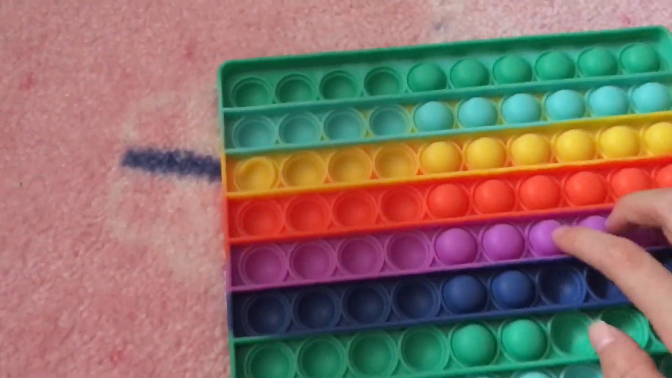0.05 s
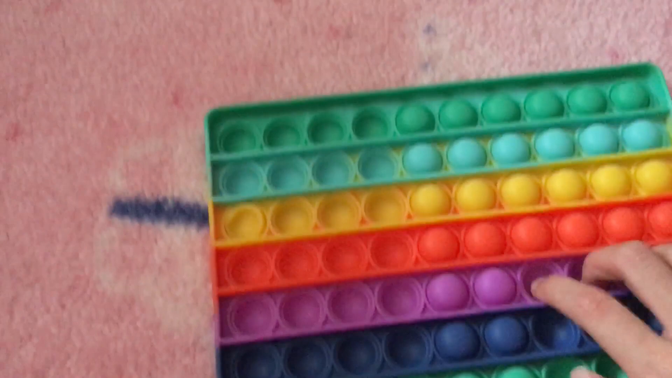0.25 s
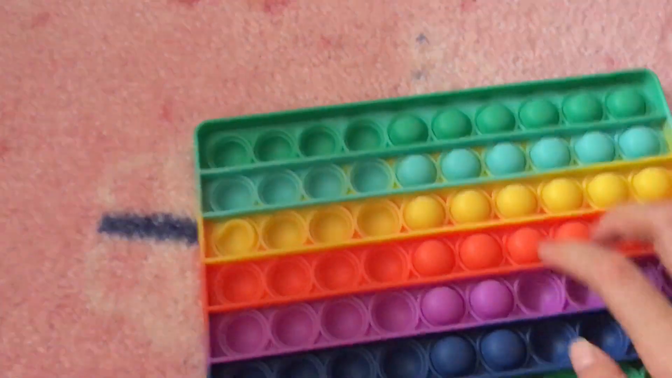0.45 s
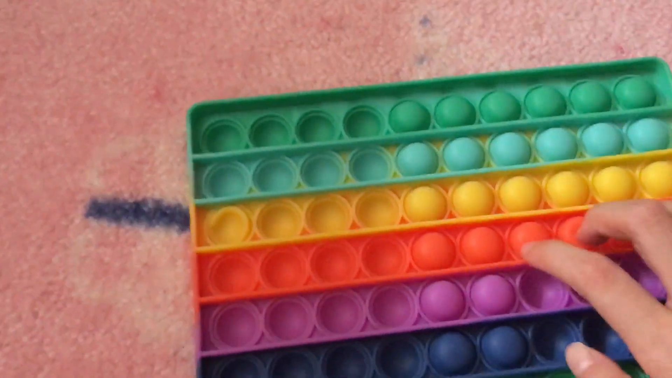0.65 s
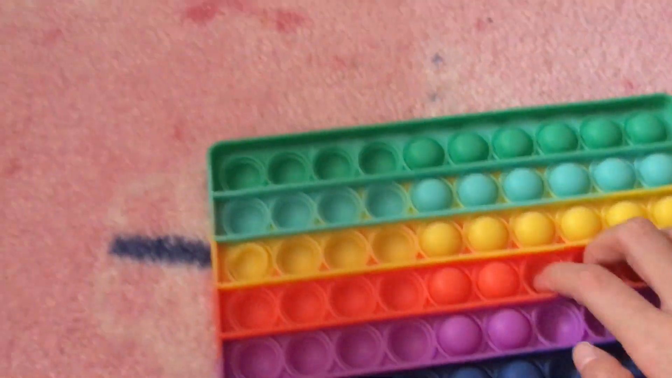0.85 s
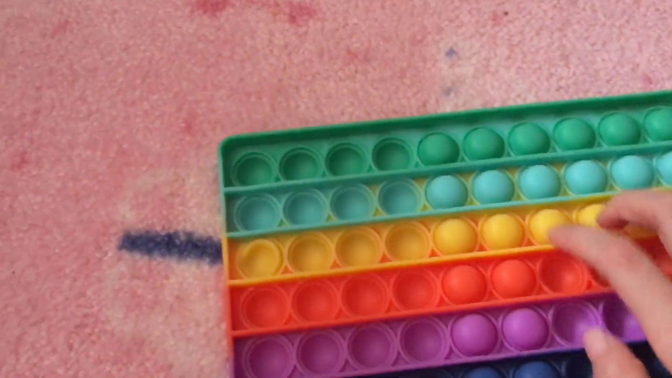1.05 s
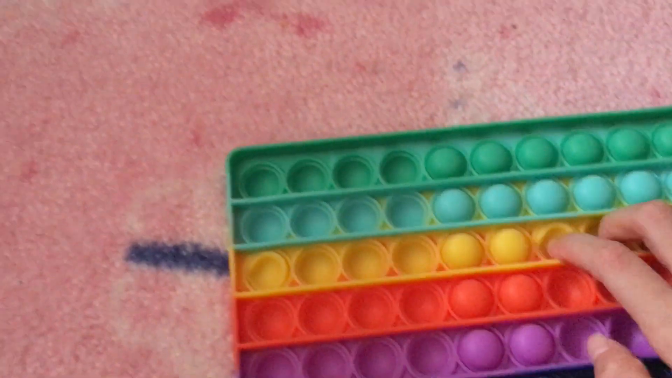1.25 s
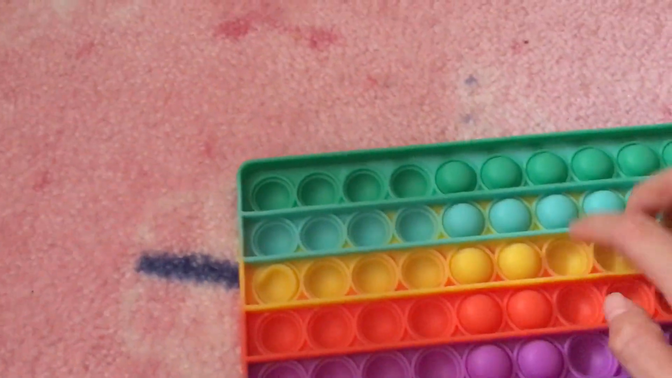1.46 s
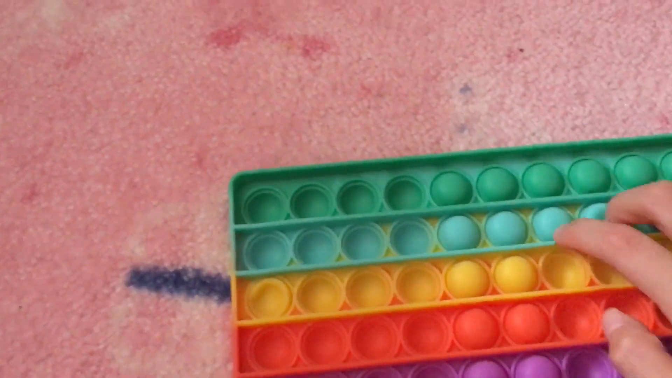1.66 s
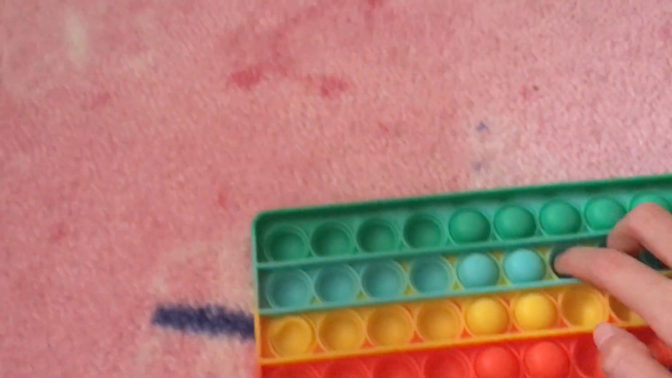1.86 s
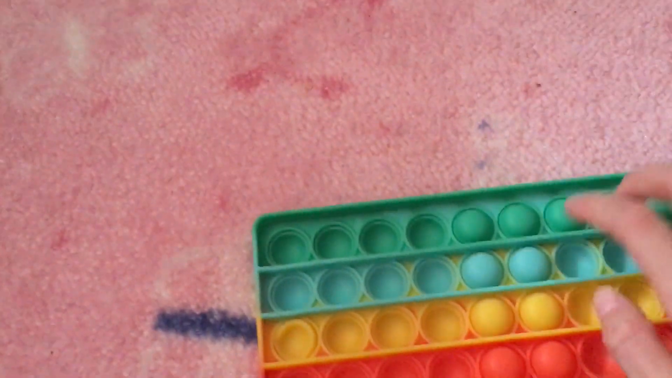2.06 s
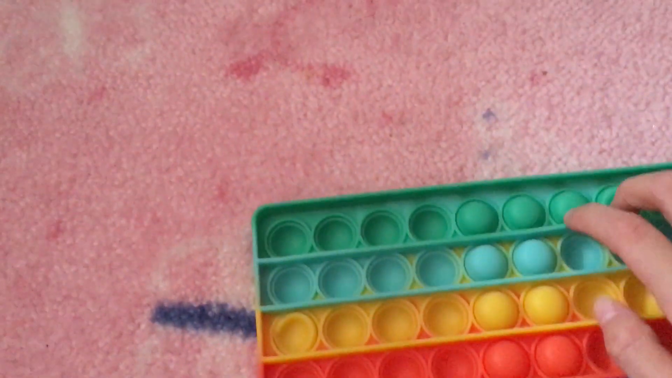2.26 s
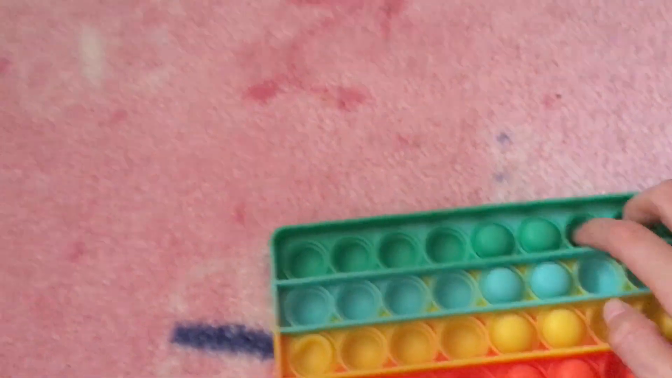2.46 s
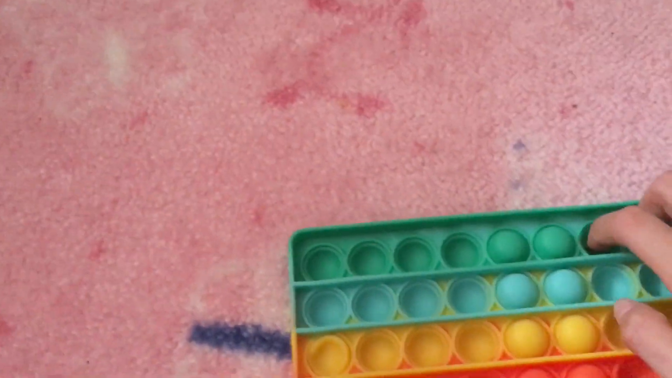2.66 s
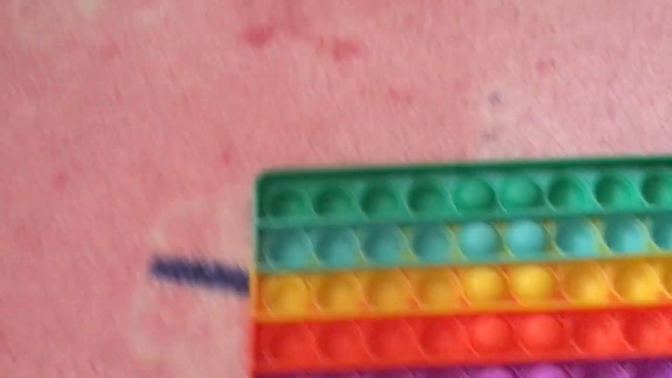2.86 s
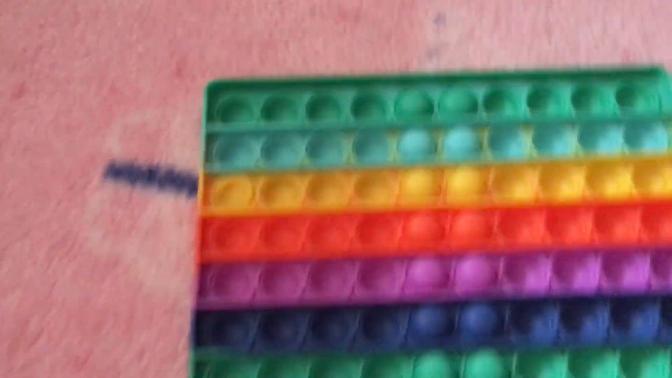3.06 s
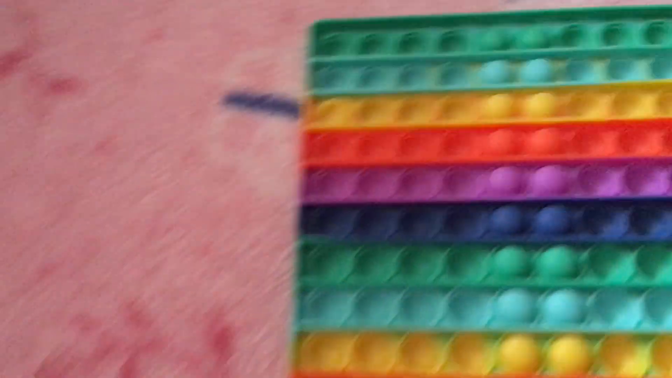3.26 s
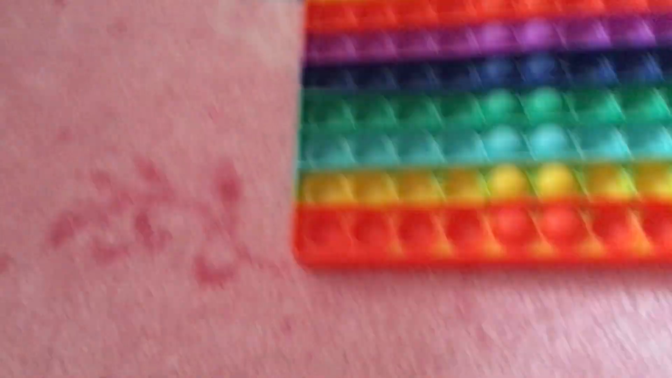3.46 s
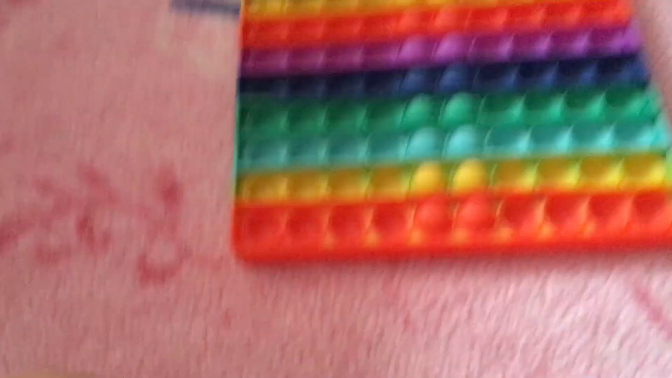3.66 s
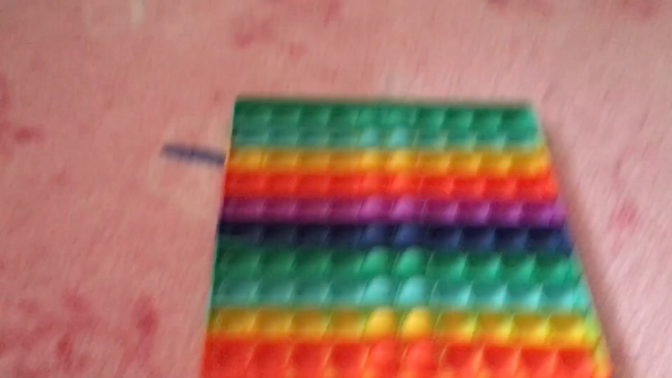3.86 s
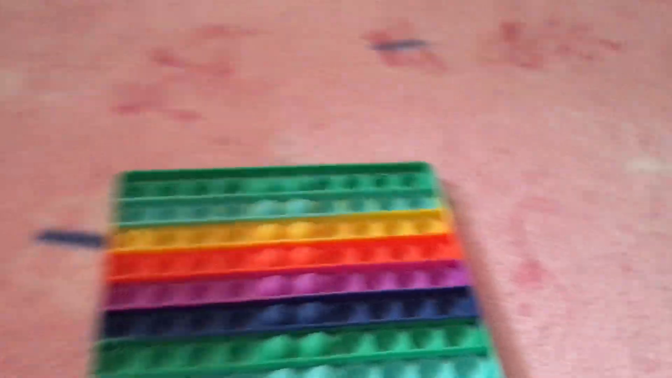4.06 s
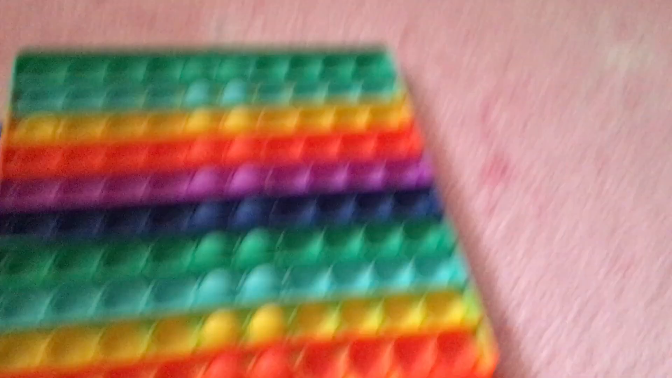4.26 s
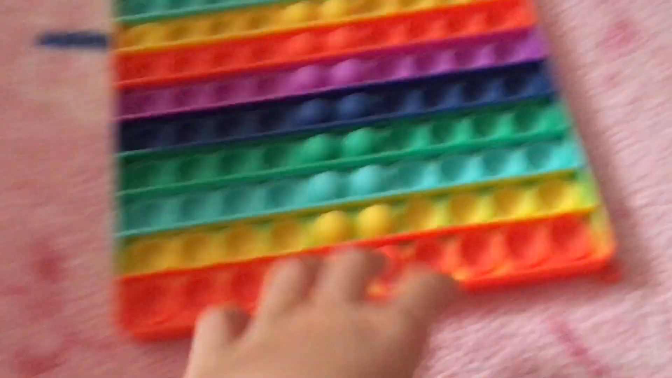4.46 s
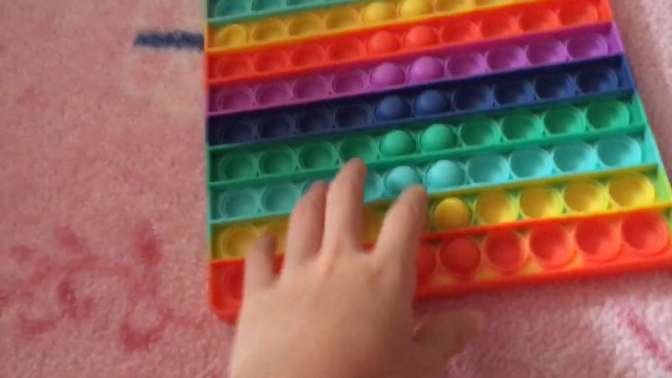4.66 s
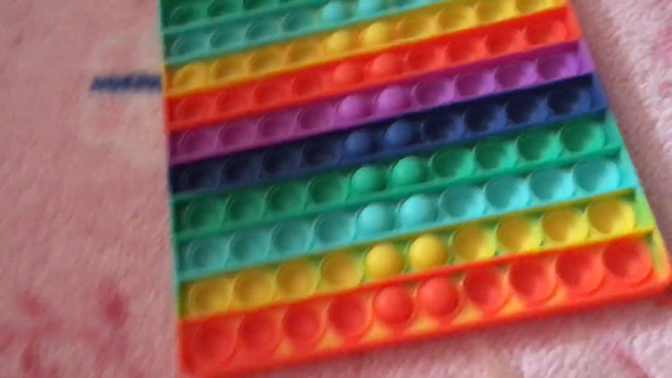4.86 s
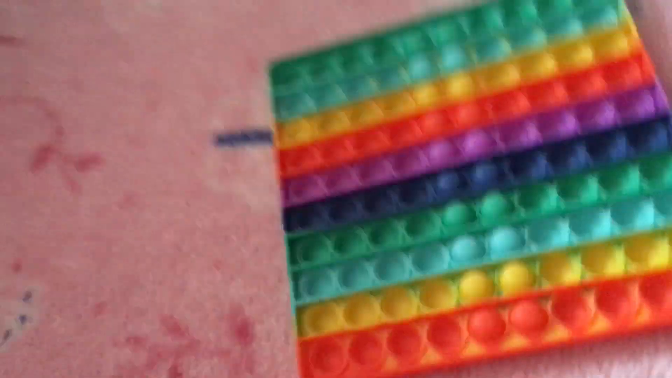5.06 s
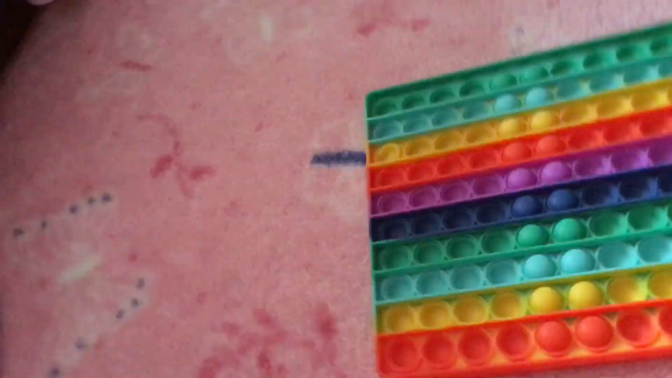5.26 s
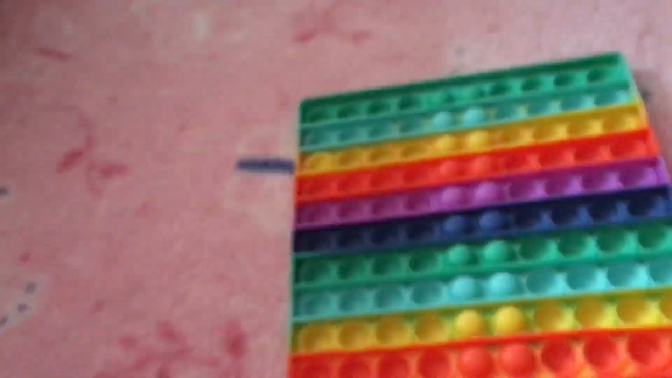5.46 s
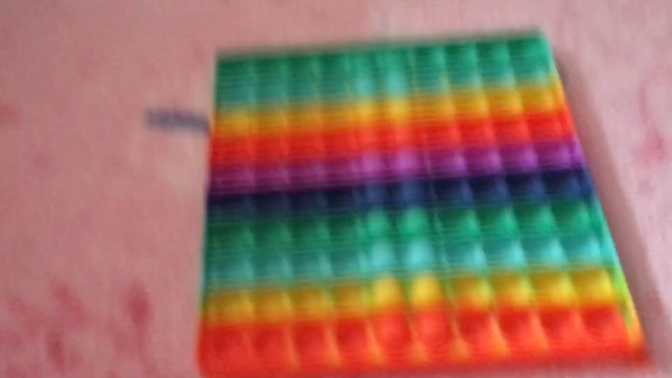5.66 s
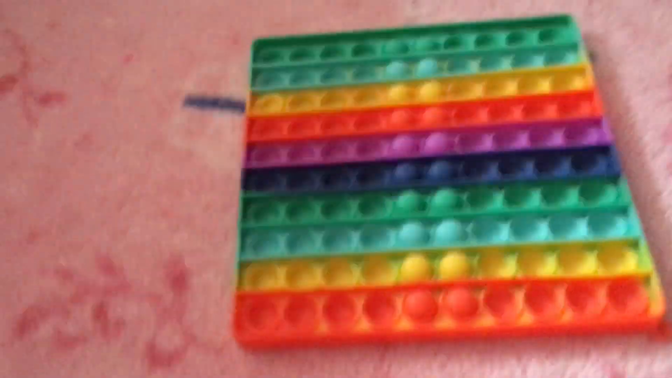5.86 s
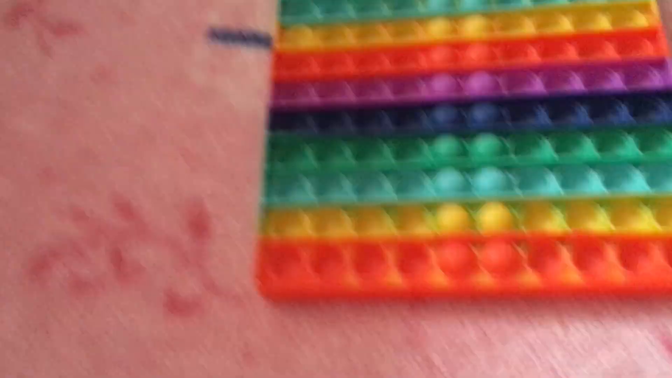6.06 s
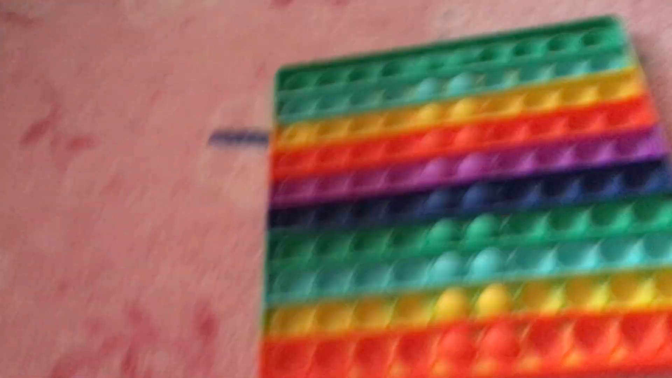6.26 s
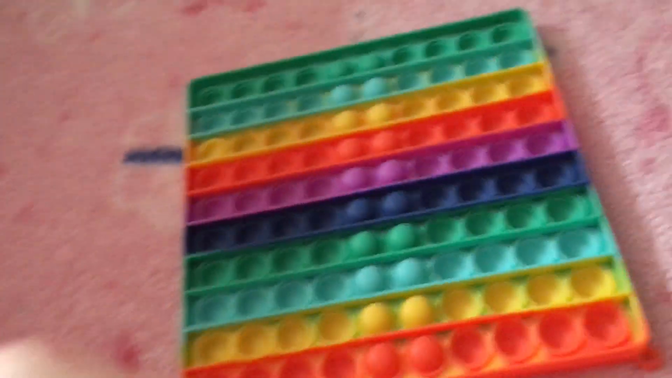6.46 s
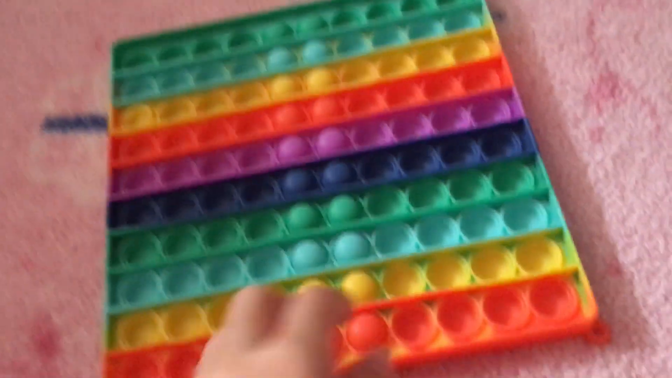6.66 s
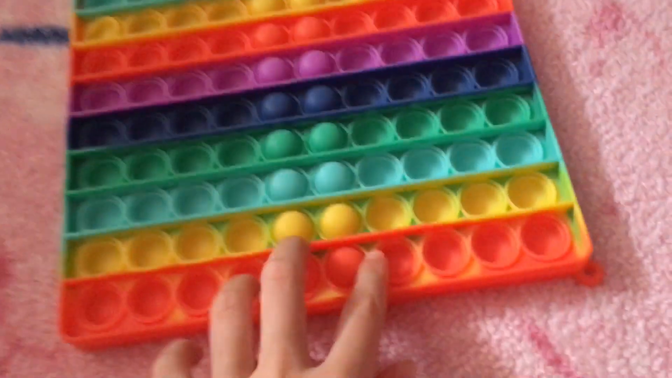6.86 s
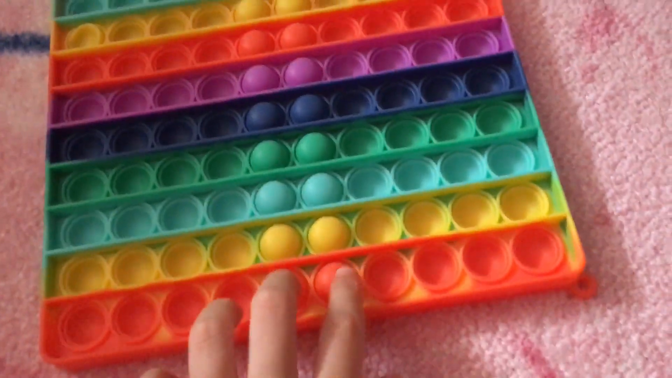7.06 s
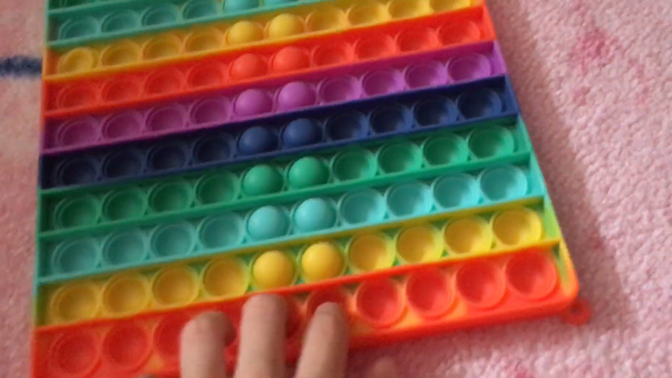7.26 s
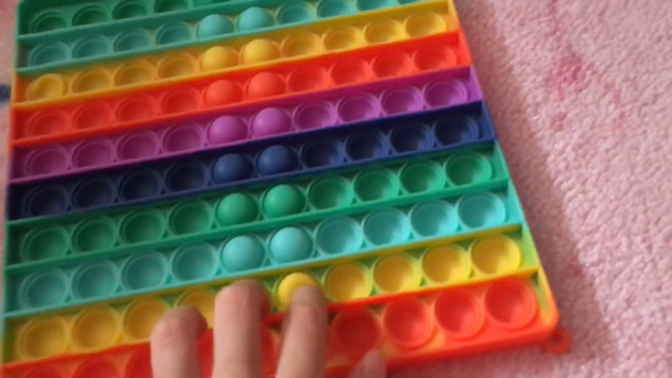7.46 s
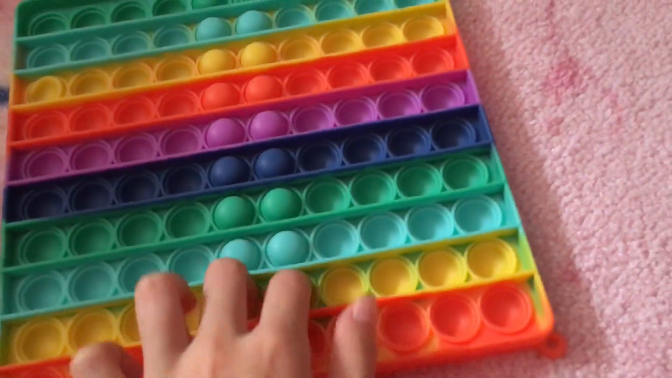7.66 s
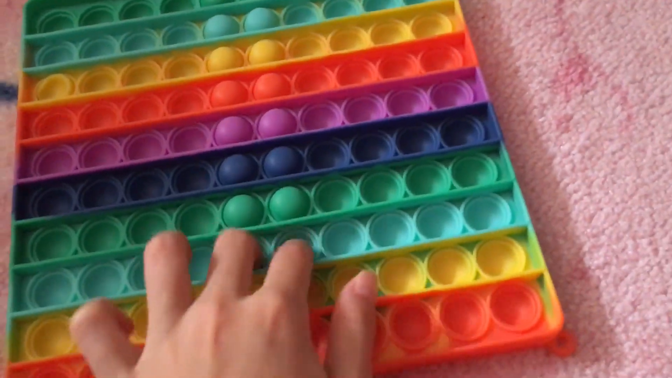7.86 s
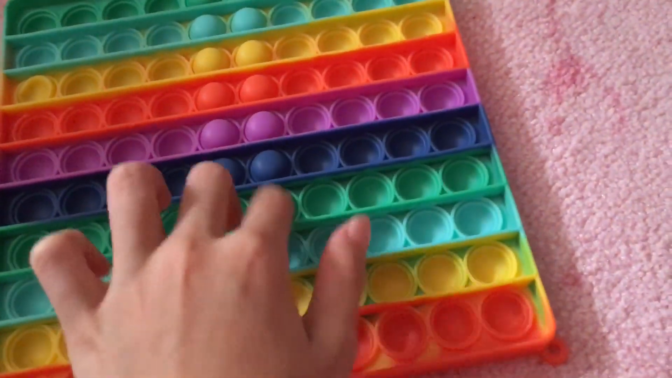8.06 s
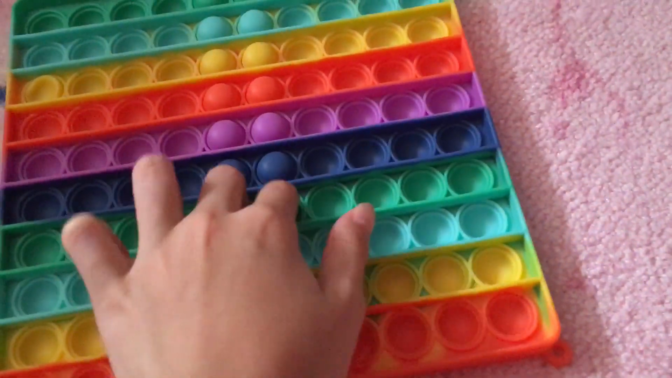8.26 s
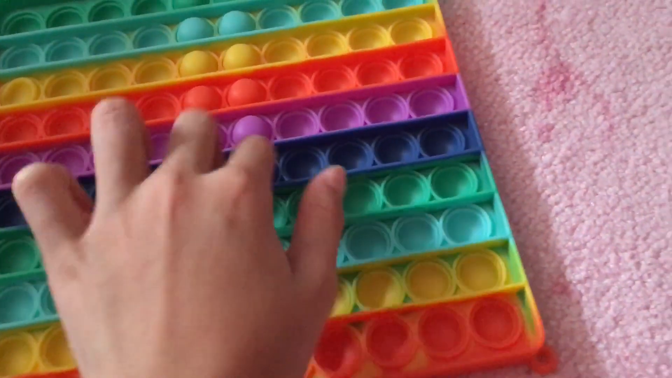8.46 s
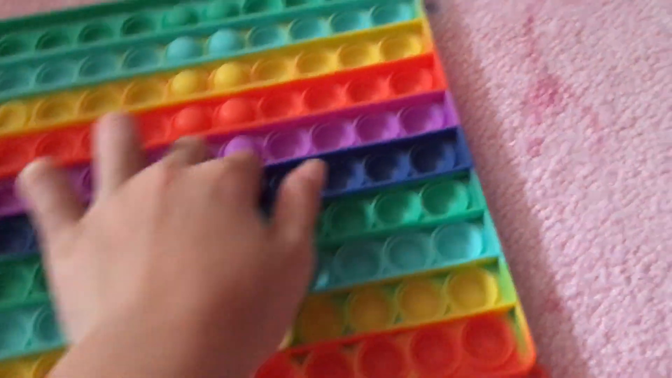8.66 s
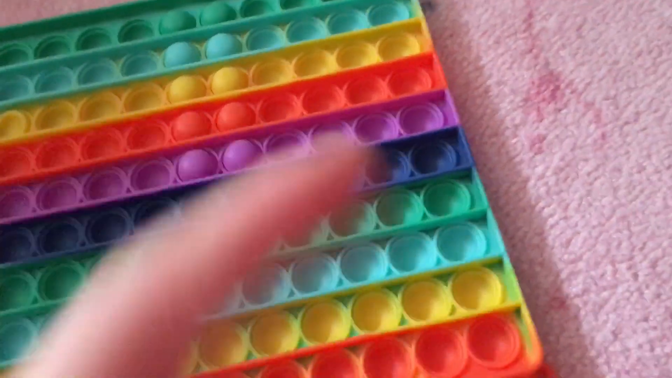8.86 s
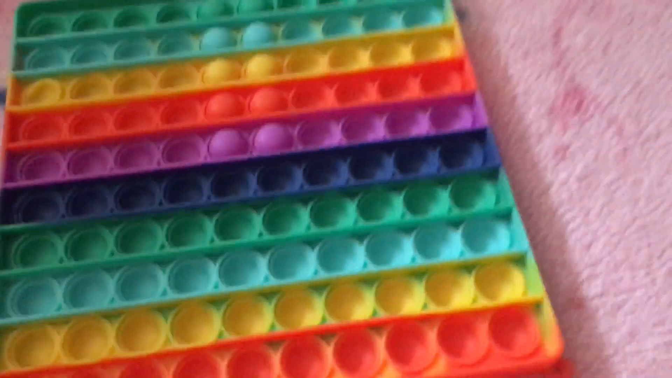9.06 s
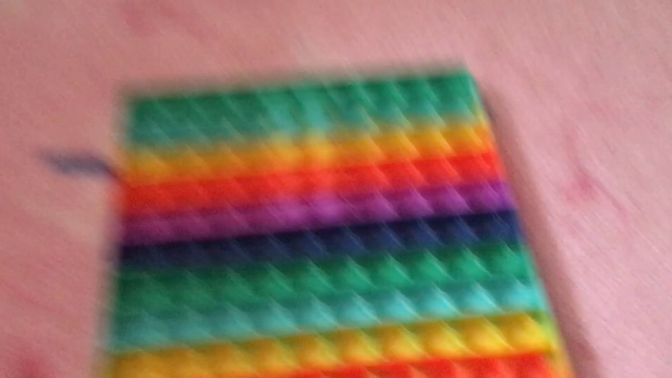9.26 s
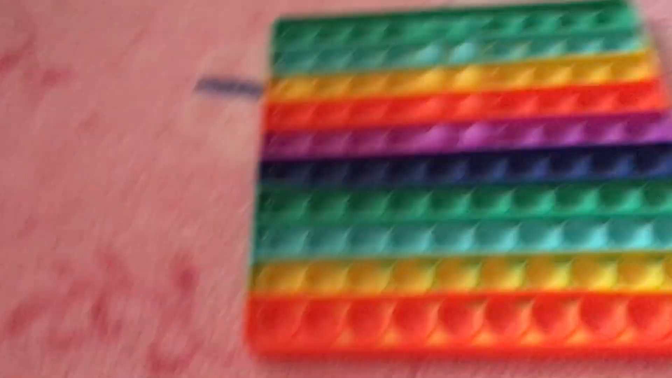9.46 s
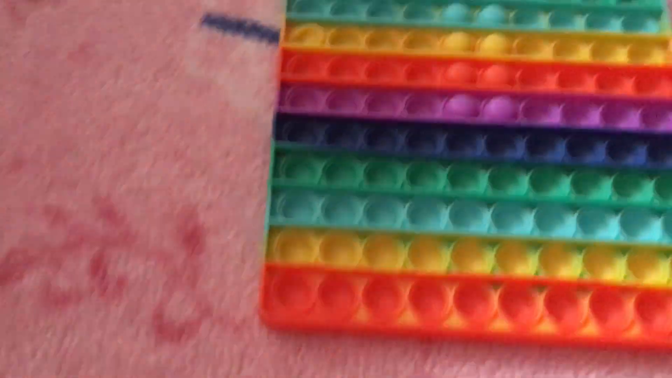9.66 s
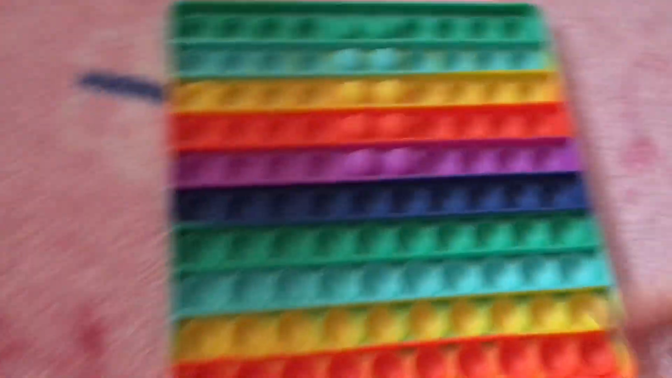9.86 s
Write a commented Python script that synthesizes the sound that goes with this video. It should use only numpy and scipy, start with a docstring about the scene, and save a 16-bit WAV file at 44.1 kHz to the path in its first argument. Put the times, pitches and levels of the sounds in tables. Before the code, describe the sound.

Silicone toy bubbles snap inward in short uneven groups, then the hand-held microphone rustles and thuds, before more pops and a final rub.

```python
"""Fingers press in the bubbles of a silicone pop toy lying on a fleece blanket in a small room.
Each dome buckles in a few quick snaps, every snap a twitch of falling pitch a few cycles long.
Fingertips also tap and slide on the silicone. Between the rows the hand-held microphone is shifted:
skin and cloth rub on its case as filtered noise, and fingers bump it with low thuds, once hard.
Beneath it all lie a faint rumble of the leaning hand and the steady noise of the still room."""
import sys
import numpy as np
from scipy import signal
from scipy.fft import rfft, irfft
from scipy.io import wavfile
from scipy.ndimage import uniform_filter1d

SR = 44100
rng = np.random.default_rng(int(sys.argv[2]) if len(sys.argv) > 2 else 0)


def dump(signal):
    """Clip the signal to [-1, 1] and save it as 16-bit WAV at the path in sys.argv[1]."""
    limited = np.clip(np.atleast_2d(signal).T, -1, 1)
    pcm = np.round(limited * 32767).astype(np.int16)
    wavfile.write(sys.argv[1], SR, pcm)


N = 437913
TIME = np.arange(N) / SR   # seconds
# clock of one short sound, in seconds: it stays at zero for the first 20 ms, then runs
AGE = np.maximum(TIME[:4096] - .02, 0)

# The snaps of the domes; a dome snaps one to five times as it flips.
# Each row: time in seconds, body level in dB (rms over the snap), rim in dB over the body,
# tick in dB over the body.
POPS = [(0.2046, -18.5, -3, -37), (0.215, -29, -10, -32), (0.221, -18, -2.5, -38.5),
        (0.2355, -18, -9.5, -44), (0.2514, -24, -4.5, -36), (0.7217, -28.5, -15, -32),
        (0.7254, -25, -13, -28), (0.7287, -27.5, -18, -26), (0.7335, -17, -5.5, -26), (0.76, -37, -9, -26),
        (0.7954, -25.5, -2, -29.5), (0.8175, -20, -15, -32), (1.1986, -28, -13.5, -31.5),
        (1.2081, -19.5, -11, -35), (1.2151, -23, -21, -24), (1.304, -19.5, -3.5, -32.5),
        (1.32, -24.5, -2.5, -36.5), (1.7209, -38, -10, -22.5), (1.7395, -27, -10.5, -39),
        (1.7549, -24.5, -5, -30.5), (1.8021, -29, -2, -31), (1.8277, -22.5, -8, -35),
        (2.3502, -42, -3, -14), (2.359, -34, -12, -18), (2.4696, -35.5, -8, -21.5), (2.5852, -35, -7, -17),
        (7.2216, -32.5, -7, -46), (7.231, -29.5, -13, -21), (7.2475, -33.5, -12.5, -15),
        (7.553, -40, -4, -49), (7.5702, -20.5, 0, -28), (7.5835, -20, 0.5, -18.5), (7.855, -28, -28, -37),
        (7.867, -20.5, -5, -39), (7.8801, -21.5, -6.5, -54.5), (8.255, -19, -5, -33),
        (8.2836, -18, -5, -28), (8.556, -34, -26, -31), (8.5681, -25, -13, -24.5),
        (8.5724, -19.5, -18, -41)]
# a full snap has this level and pitch; a gentler one swings lower
FULL_SNAP_DB, FULL_SNAP_HZ, SAG_OCTAVES_PER_DB = -24.5, 650, 0.1


def pops():
    """Domes flip in quick snaps, lower in pitch when gentle."""
    out = np.zeros(N)
    for time, body_db, rim_db, tick_db in POPS:
        gentleness_db = max(FULL_SNAP_DB - body_db, 0)
        hz = FULL_SNAP_HZ * 2 ** (-SAG_OCTAVES_PER_DB * gentleness_db)
        sound = snap(hz, body_db, body_db + rim_db, body_db + tick_db, lag_s=0.0027, ripple_db=5.5)
        add(out, time - .0003, sound)
    return out


# What a snapping dome rings with. Each row: frequency in Hz, relative level in dB.
DOME = [(60, -39), (110, -24), (200, -14.5), (350, -2.5), (470, -5.5), (620, 5), (800, 0), (1080, -7),
        (1550, -1.5), (2150, -9.5), (2600, -25.5), (3400, -30), (5000, -52), (9000, -69)]
DOME_HZ = 630   # the body pitch at which the table above is not shifted
SNAP_S = .004   # the span over which the level of a snap is counted


def snap(hz, body_db, rim_db, tick_db, lag_s, ripple_db, rim_spread=0.01):
    """A tick and the stiff rim sound first, the soft body swings just after."""
    # a snap that is mostly rim reaches higher
    rim_share_db = np.clip(rim_db - body_db + 6, -6, 8)
    rim_pitch = 2 ** (rim_share_db / 70) * np.exp(rim_spread * rng.standard_normal())
    body = bending_wave(DOME, hz / DOME_HZ, 1100, False, lag_s, ripple_db, SNAP_S)
    rim = bending_wave(DOME, rim_pitch, 1100, True, lag_s, ripple_db, SNAP_S)
    return from_db(body_db) * body + from_db(rim_db) * rim + from_db(tick_db) * tick()


# The colour of a tick. Each row: frequency in Hz, relative level in dB per Hz.
TICK = [(2500, 3), (4000, 1), (6000, 0.5), (9000, -7), (12000, -12.5), (15000, -19)]


def tick():
    """A very short bright click, made of fast-fading noise."""
    return rms_one(burst(TICK, rise_s=.0002, t60=.008), SNAP_S)


FREQ = np.maximum(np.fft.rfftfreq(len(AGE), 1 / SR), 1)   # Hz
DAMPING_S = .03   # the hand and the blanket smother a flexing pulse after this time


def bending_wave(spectrum, pitch, split_hz, upper, lag_s, ripple_db, span_s):
    """A flexing pulse below or above a split: bending waves travel as the root of frequency, lows late."""
    hz, db = np.transpose(spectrum)
    # random peaks and dips along the spectrum
    bumpiness = np.interp(np.sqrt(FREQ / 20), np.arange(len(FREQ)), rng.standard_normal(len(FREQ)))
    side = (FREQ / split_hz) ** (8 * upper) / (1 + (FREQ / split_hz) ** 8)
    gain = from_db(np.interp(np.log(FREQ / pitch), np.log(hz), db) + ripple_db * bumpiness)
    gain = gain * side * np.minimum(FREQ / hz[0], 1)
    # lag_s is the travel time at 1 kHz; the 3 kHz front arrives at age zero
    quiet_s = np.mean(AGE == 0) * len(AGE) / SR
    turns = 2 * lag_s * np.sqrt(1000 * FREQ) + FREQ * (quiet_s - lag_s / np.sqrt(3))
    wave = irfft(1j * gain * np.exp(-2j * np.pi * turns), len(AGE))
    # a soft front, with silence ahead of it
    arrived = uniform_filter1d((AGE > 0) * 1.0, size=131)
    smothered = np.exp(-(AGE / DAMPING_S) ** 2)
    return rms_one(wave * np.minimum(2 * arrived, 1) * smothered, span_s)


# A fingertip lands on the silicone. Each row: start in seconds, rim level in dB.
TOUCHES = [(0.519, -48.5), (0.5256, -47), (1.0551, -48), (1.065, -49.5), (1.091, -57), (1.4772, -51),
           (1.583, -46.5), (2.1084, -49.5), (7.4419, -56.5), (7.8188, -55.5), (8.1, -59), (8.201, -56.5),
           (8.525, -54), (8.5342, -56)]
TOUCH_HZ, TOUCH_BODY_DB, TOUCH_TICK_DB = 839, 1, -21.5   # the levels are relative to the rim


def fingertip_touches():
    """Fingertips land with a light tap that flexes the silicone like a small snap."""
    out = np.zeros(N)
    for time, db in TOUCHES:
        tap = snap(TOUCH_HZ, db + TOUCH_BODY_DB, db, db + TOUCH_TICK_DB, lag_s=0.0011, ripple_db=8.0)
        add(out, time, tap)
    return out


# A fingertip slides over the silicone.
# Each row: time of the middle in seconds, half length in seconds, peak level in dB.
SLIDES = [(0.932, 0.0038, -62.5), (1.445, 0.0087, -63), (2.786, 0.0057, -61), (2.83, 0.014, -63),
          (7.028, 0.0051, -63.5), (8.639, 0.058, -76.5)]
# The colour of the squeak. Each row: frequency in Hz, relative level in dB per Hz.
SQUEAK = [(1500, 9), (3500, -5.5), (5200, 3), (6500, -5), (7500, -17), (12000, -16)]


def finger_slides():
    """Brief soft squeaks of skin on silicone, each a swell of coloured noise."""
    return sum(swell(*row) for row in SLIDES) * noise(SQUEAK)


# Where the toy's sound lingers in the room.
# Each row: low edge in Hz, high edge in Hz, time to fade by 60 dB in seconds, level in dB.
ROOM = [(150, 560, 0.12, -29.5), (504, 1500, 0.21, -32), (1050, 2200, 0.14, -28), (2292, 3510, 0.17, -22),
        (3730, 21000, 0.11, -11)]


def room(x, build_s=0.0017):
    """Diffuse reflections build up quickly and die band by band."""
    age = TIME[:SR // 2]
    tail = 0
    for low, high, t60, db in ROOM:
        band = cut(rng.standard_normal(len(age)), [low, high], "band", order=3)
        band = band * from_db(-60 * age / t60) * (1 - np.exp(-(age / build_s) ** 2))
        tail = tail + from_db(db) * band / np.sqrt(np.sum(band ** 2))
    return signal.fftconvolve(x, tail)[:N]


# A finger bumps the case. Each row: start in seconds, thud pitch in Hz, thud level in dB,
# knock level in dB; both levels are rms over the bump.
BUMPS = [(2.973, 135, -54, -53.5), (3.117, 182, -43, -49), (3.287, 169, -46, -51), (3.454, 150, -56, -55.5),
         (3.537, 164, -48, -50), (3.607, 250, -48.5, -57), (3.697, 165, -59, -68), (3.784, 160, -50, -44.5),
         (3.834, 222, -48, -51), (3.919, 123, -35, -55), (4.103, 132, -44, -56), (4.297, 122, -40.5, -40),
         (4.943, 142, -49, -60.5), (5.016, 122, -38, -49), (5.422, 182, -12.5, -45.5),
         (5.499, 215, -41, -54), (5.595, 171, -42, -56), (5.679, 172, -55, -55.5), (5.792, 218, -44, -39.5),
         (5.888, 219, -57, -50.5), (5.904, 200, -61, -46), (5.986, 169, -45, -53), (6.067, 195, -55, -54),
         (6.166, 192.6, -50.5, -69), (6.285, 200, -55, -58.5), (6.338, 159, -51, -59.5),
         (6.375, 172, -45.5, -50), (8.955, 157.4, -23, -43.5), (9.021, 139, -46.5, -47),
         (9.047, 121, -46, -54.5), (9.122, 200, -39.5, -45.5), (9.282, 246, -49.5, -52),
         (9.433, 110, -49.5, -45), (9.609, 231, -69, -54)]
# What the bumped case rings with. Each row: frequency in Hz, relative level in dB.
CASE = [(30, -42.5), (60, -19.5), (110, -10.5), (165, 4), (235, -12), (290, -5), (420, -23), (700, -25.5),
        (1100, -27), (2000, -39), (3000, -41), (6000, -67.5)]
CASE_HZ = 175   # the thud pitch at which the table above is not shifted
BUMP_S = .02   # the span over which the level of a bump is counted
# the scratch grows with the thud: dB (before it is halved) at a typical thud, and dB per dB
SCRATCH_DB, TYPICAL_THUD_DB, SCRATCH_FOLLOWS = -62, -44.5, 0.62


def bumps(lag_s=0.003238):
    """A finger meets the case: a scratch and a short skid, then the heavy low swing."""
    out = np.zeros(N)
    for time, hz, thud_db, knock_db in BUMPS:
        thud = bending_wave(CASE, hz / CASE_HZ, 750, False, lag_s, ripple_db=1.0, span_s=BUMP_S)
        contact = bending_wave(CASE, 1, 400, True, lag_s, ripple_db=2.5, span_s=BUMP_S)
        skid = rms_one(burst(RUB, rise_s=0.00054, t60=0.05), BUMP_S)
        knock = rms_one(cut(contact, 3200, "low") + skid / 2, BUMP_S)
        scratch = rms_one(burst(HISS, rise_s=0.0023, t60=0.03), BUMP_S) / 2
        scratch_db = SCRATCH_DB + SCRATCH_FOLLOWS * (thud_db - TYPICAL_THUD_DB)
        bump = from_db(thud_db) * thud + from_db(knock_db) * knock + from_db(scratch_db) * scratch
        add(out, time, bump)
    return out


# The case creaks as the grip shifts. Each row: start in seconds, level in dB.
CREAKS = [(3.117, -55), (3.539, -56), (3.951, -51), (4.101, -51), (5.4255, -44.5), (5.4395, -43),
          (5.4514, -69.5), (6.339, -59), (6.376, -57), (8.954, -59)]


def creaks():
    """The case creaks with tiny clicks as the grip shifts."""
    out = np.zeros(N)
    for time, db in CREAKS:
        add(out, time, from_db(db) * tick())
    return out


# The colours of the low, middle and high parts of friction on the case.
# Each row, in all three: frequency in Hz, relative level in dB per Hz.
RUMBLE = [(50, 0), (100, 2), (200, 4), (330, -4), (600, -19.5)]
RUB = [(220, -2.5), (400, -1), (700, 0.5), (1000, -6.5), (1300, -4.5), (2000, -11), (2700, -16),
       (4000, -34), (7000, -37.5)]
HISS = [(1500, 0.5), (3000, 7.5), (5000, 5), (8000, 3), (11000, 3), (15500, -1)]


def rubbing(catch_db=3.0, scuff_db=2.0, lump_db=3.5, colour_db=3.0, grain_db=3.0,
            snags_per_s=90, crackle_db=-13):
    """Skin and cloth drag over the case, catching and slipping; fine fibres add a grainy hiss."""
    rumble, rub, hiss = friction_levels()
    catch = catch_db * drift(rate=81) + scuff_db * drift(rate=22)
    # the patch of contact keeps changing, and the colour with it
    friction = noise(RUB)
    edges = np.geomspace(200, 6400, 8)   # Hz
    patches = 0
    for k, band in enumerate(zip(edges, edges[1:])):
        patch = cut(friction, band, "band") * from_db(colour_db * drift(rate=45))
        patches = patches + patch * (-1) ** k   # neighbouring bands have opposite signs
    low = rumble * from_db(catch + lump_db * drift(rate=50)) * noise(RUMBLE)
    middle = rub * from_db(catch) * rms_one(patches)
    high = hiss * from_db(.5 * catch + grain_db * drift(rate=1300)) * noise(HISS)
    # now and then a fibre snags and lets go with a tiny crackle
    snags = (rng.random(N) < snags_per_s / SR) * rng.standard_normal(N)
    crackle = rub * from_db(crackle_db) * rms_one(cut(snags + 1e-18, [700, 2800], "band", order=4))
    return low + middle + high + crackle


# The microphone is carried to a new place, with light friction all the way.
# Each row: start in seconds, end in seconds.
MOVES = [(2.93, 4.4), (4.779, 6.43), (8.939, 11)]
MOVE_RUB_DB, MOVE_HISS_DB = -68, -75
# The grip slips over the case in strokes.
# Each row: start in seconds, end in seconds, rub level in dB, hiss level in dB.
STROKES = [(2.988, 3.117, -70.5, -72), (3.252, 3.792, -62, -73), (3.555, 3.606, -54.5, -66),
           (3.772, 3.973, -55.5, -76), (3.907, 3.935, -53, -54), (4.015, 4.138, -49.5, -60.5),
           (4.196, 4.392, -54, -61.5), (4.272, 4.33, -47.5, -82), (4.977, 5.151, -56, -58.5),
           (5.047, 5.12, -75, -52), (5.238, 5.436, -52, -65), (5.501, 5.555, -49, -63),
           (5.553, 5.702, -61, -85), (5.742, 5.792, -59, -68), (5.921, 5.993, -48.5, -64.5),
           (6.04, 6.103, -64.5, -71), (6.33, 6.415, -59.5, -71), (9.012, 9.171, -54, -68.5),
           (9.247, 9.453, -54.5, -62)]
RUMBLE_DB, RUMBLE_FOLLOWS = -68, 0.73   # rumble under light friction, and its dB per dB of rub


def friction_levels():
    """Gains of rumble, rub and hiss: moves and strokes add in power, and the rumble follows the rub."""
    moves = [(*span, MOVE_RUB_DB, MOVE_HISS_DB) for span in MOVES]
    rub_power, hiss_power = 0, 0
    for start, end, rub_db, hiss_db in moves + STROKES:
        contact = stroke(start, end)
        rub_power = rub_power + (contact * from_db(rub_db)) ** 2
        hiss_power = hiss_power + (contact * from_db(hiss_db)) ** 2
    rub, hiss = np.sqrt(rub_power), np.sqrt(hiss_power)
    rumble = from_db(RUMBLE_DB) * (rub / from_db(MOVE_RUB_DB)) ** RUMBLE_FOLLOWS
    return rumble, rub, hiss


def stroke(start, end, attack_s=0.024, release_s=0.032):
    """Friction builds up from the start, holds, and lets go from the end on."""
    build_up = np.clip((TIME - start) / attack_s, 0, 1)
    let_go = np.clip(1 - (TIME - end) / release_s, 0, 1)
    return build_up * let_go


# Quick firm swipes over the case. Each row: time of the middle in seconds, half length in seconds,
# peak level in dB, resonance in Hz.
SWIPES = [(3.786, 0.003, -40, 1620), (3.818, 0.012, -56, 1600), (3.995, 0.012, -29, 740),
          (5.295, 0.021, -44.5, 650), (5.959, 0.021, -42.5, 930), (9.351, 0.048, -37.5, 940),
          (9.36, 0.008, -28, 870)]


def swipes():
    """A firm swipe drives a hollow resonance of the case and a weaker one above it."""
    out = 0
    for time, half_length, db, hz in SWIPES:
        friction = noise(RUB)
        hollow = resonate(friction, hz, width_hz=245)
        upper = from_db(-8.0) * resonate(friction, hz * 1.76, width_hz=290)
        sound = rms_one(hollow + upper + from_db(-34.0) * friction)
        out = out + swell(time, half_length, db) * sound
    return out


# The hand leans on the toy with a faint low rumble.
# Each row: time of the middle in seconds, half length in seconds, peak level in dB.
LEANS = [(7.874, 0.21, -58.5), (8.476, 0.064, -61), (8.88, 0.11, -59.5)]


def leaning():
    """The weight of the hand on the blanket: swells of low noise."""
    weight_spectrum = [(30, -5.5), (50, -7.5), (90, -2.5), (140, -18.5)]   # Hz, relative dB per Hz
    return sum(swell(*row) for row in LEANS) * noise(weight_spectrum)


# The colour of the still room. Each row: frequency in Hz, relative level in dB per Hz.
AIR = [(30, -30.5), (45, -10.5), (66, -8.5), (102, -6), (195, -15.5), (250, -14), (330, -19.5), (620, -26),
       (750, -25.5), (900, -28.5), (2050, -32), (2700, -38), (9000, -44.5), (15500, -48.5)]
AIR_DB = -63


def still_room():
    """Steady, mostly low noise of the room at rest."""
    return from_db(AIR_DB) * noise(AIR)


def from_db(db):
    """Decibels to gain."""
    return 10 ** (np.asarray(db) / 20)


def rms_one(x, span_s=None):
    """Scale to rms 1, overall or with all its energy counted within a span."""
    count = span_s * SR if span_s else len(x)
    return x / np.sqrt(np.sum(x ** 2) / count + 1e-20)


def cut(x, hz, kind, order=2):
    """Causal Butterworth filter."""
    hz = np.clip(hz, 10, .45 * SR)
    return signal.sosfilt(signal.butter(order, hz, kind, fs=SR, output="sos"), x)


def resonate(x, hz, width_hz):
    """One resonance with gain 1 on top."""
    return signal.lfilter(*signal.iirpeak(hz, hz / width_hz, fs=SR), x)


def noise(spectrum, size=N):
    """Noise of rms 1 with a given spectrum that falls away beyond its ends."""
    hz, db = np.transpose(spectrum)
    f = np.maximum(np.fft.rfftfreq(size, 1 / SR), 1)
    skirts = np.minimum(f / hz[0], 1) ** 2 * np.minimum(hz[-1] / f, 1) ** 2
    gain = from_db(np.interp(np.log(f), np.log(hz), db)) * skirts
    return rms_one(irfft(rfft(rng.standard_normal(size)) * gain, size))


def burst(spectrum, rise_s, t60):
    """A short puff of friction noise that rises quickly and fades by 60 dB in t60 seconds."""
    return noise(spectrum, size=len(AGE)) * (1 - np.exp(-AGE / rise_s)) * from_db(-60 * AGE / t60)


def drift(rate):
    """Random wander of spread about 1 with a given number of turns a second."""
    return np.interp(TIME * rate, np.arange(N // 20), rng.standard_normal(N // 20))


def swell(time, half_length, db):
    """A smooth rise and fall of gain around a time."""
    return from_db(db) * np.exp(-np.minimum(((TIME - time) / half_length) ** 2 / 2, 50))


def add(out, time, sound):
    """Mix a short sound in so that its age starts to count at a given time."""
    at = round(time * SR) - np.count_nonzero(AGE == 0)
    out[at:at + len(sound)] += sound[:N - at]


def scene():
    """The toy sounds through the room; handling reaches the microphone through its case."""
    toy = pops() + fingertip_touches() + finger_slides()
    handling = bumps() + creaks() + rubbing() + swipes() + leaning()
    return (toy + room(toy) + handling + still_room())[None]


def record(dry):
    """The small microphone loses the deepest bass; the top is cut steeply."""
    dry = cut(dry, 38, "high", order=3)
    top_cut = signal.ellip(10, .1, 80, 15900, fs=SR, output="sos")   # ripple dB, depth dB, Hz
    return signal.sosfilt(top_cut, dry)


dry = scene()
out = record(dry)
dump(out)
```